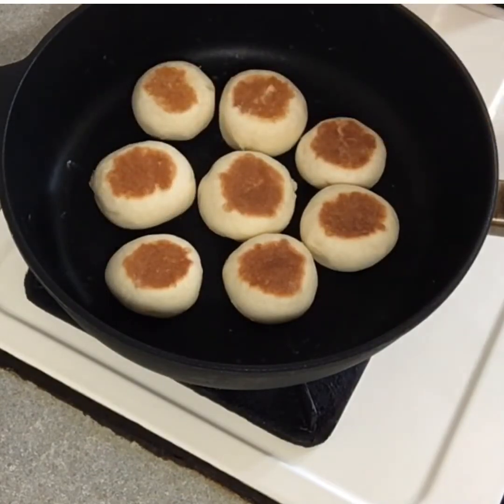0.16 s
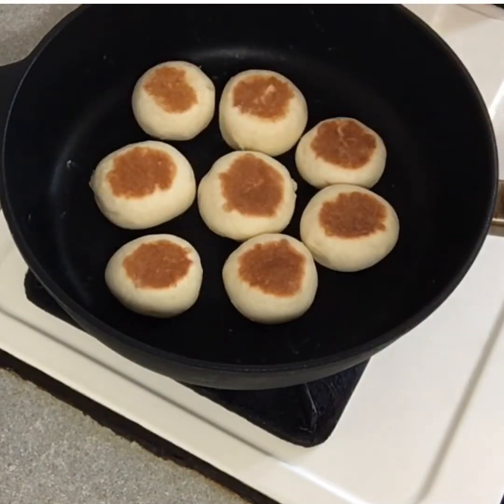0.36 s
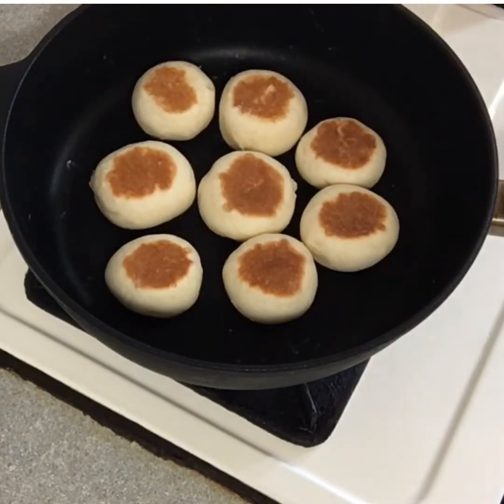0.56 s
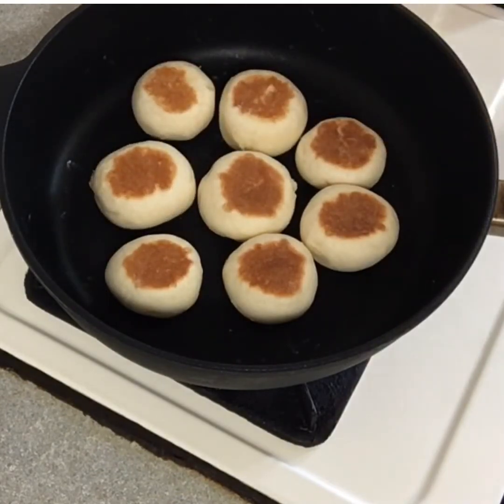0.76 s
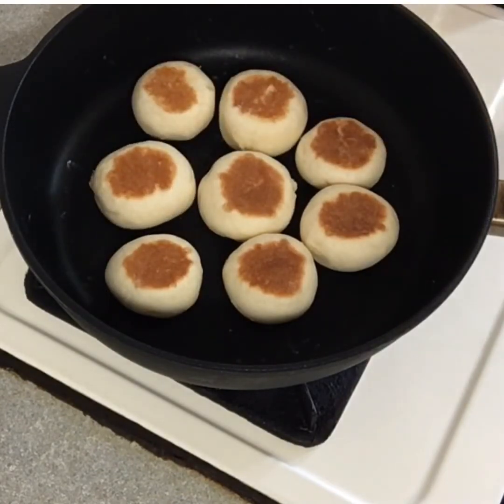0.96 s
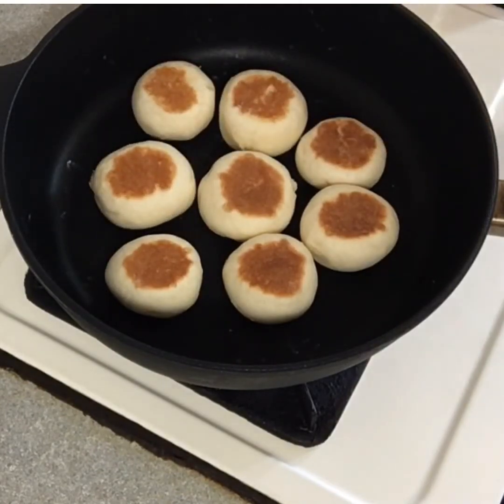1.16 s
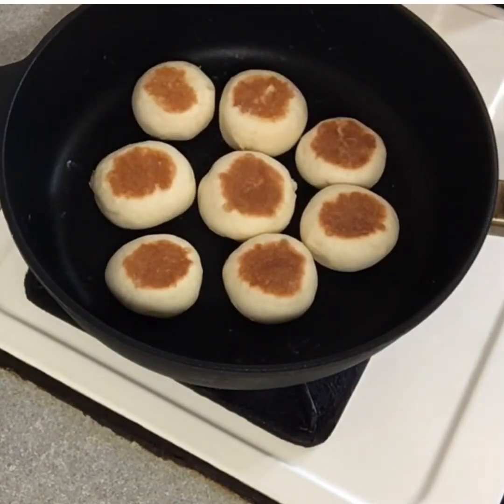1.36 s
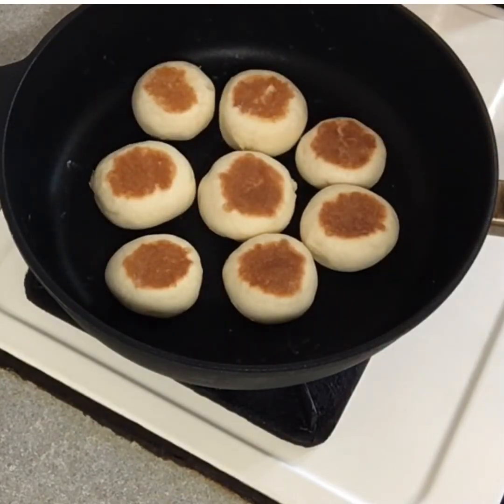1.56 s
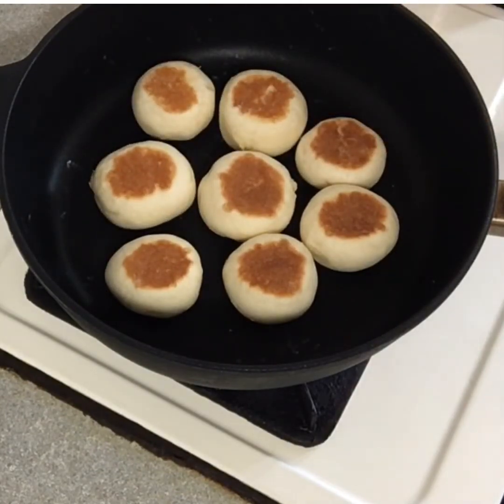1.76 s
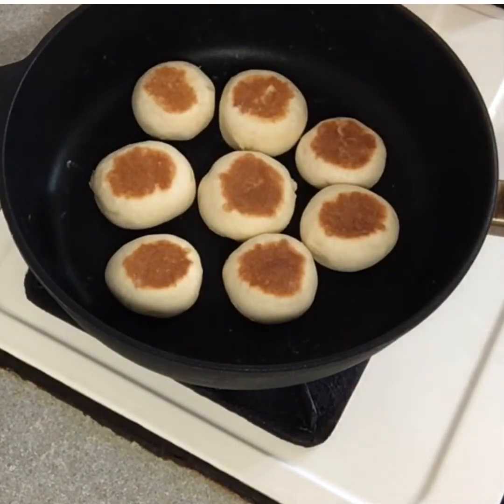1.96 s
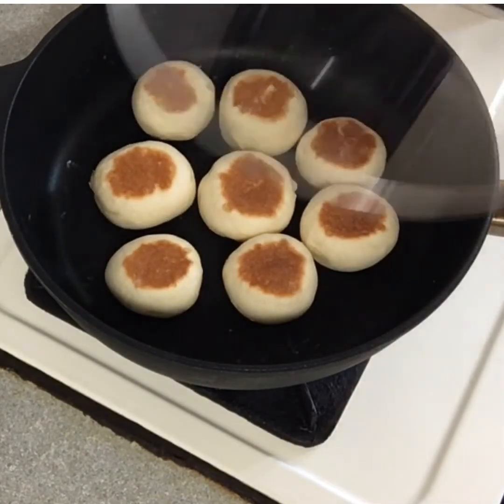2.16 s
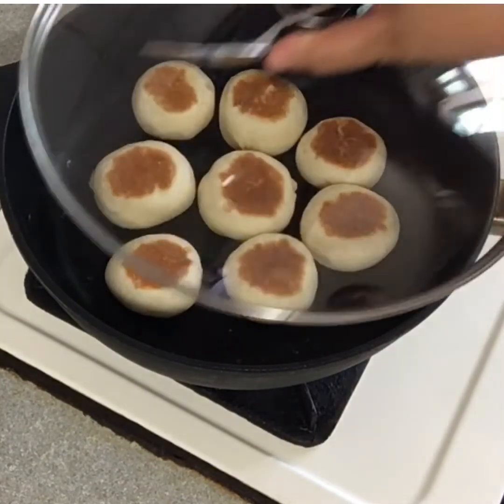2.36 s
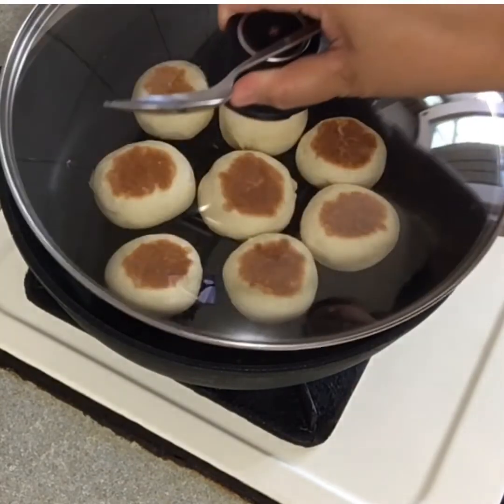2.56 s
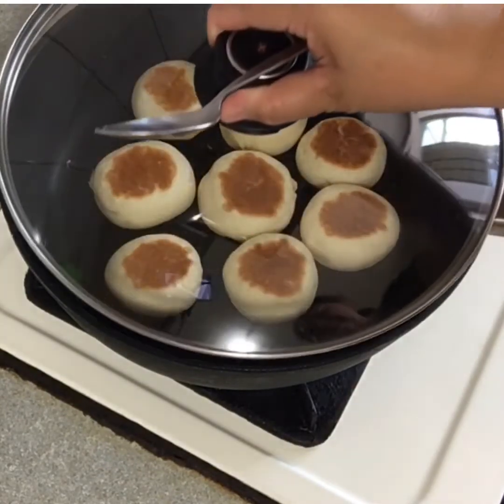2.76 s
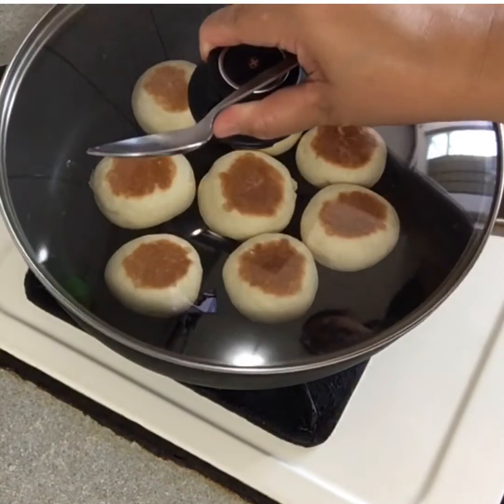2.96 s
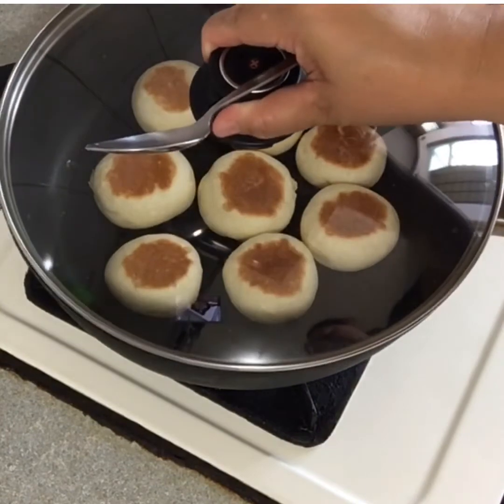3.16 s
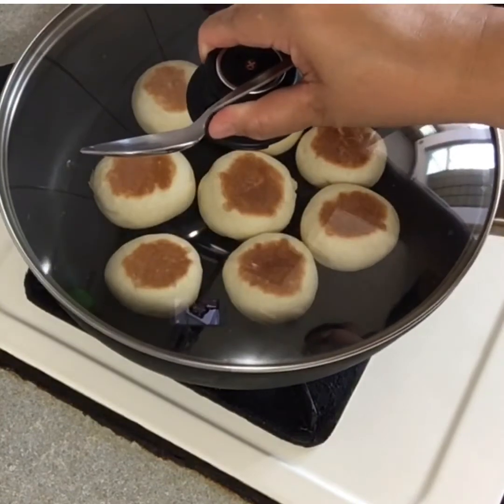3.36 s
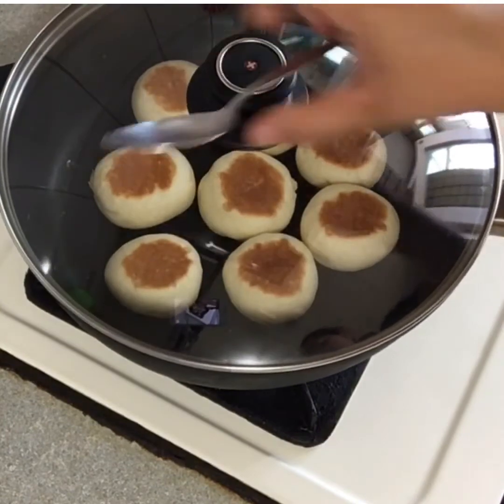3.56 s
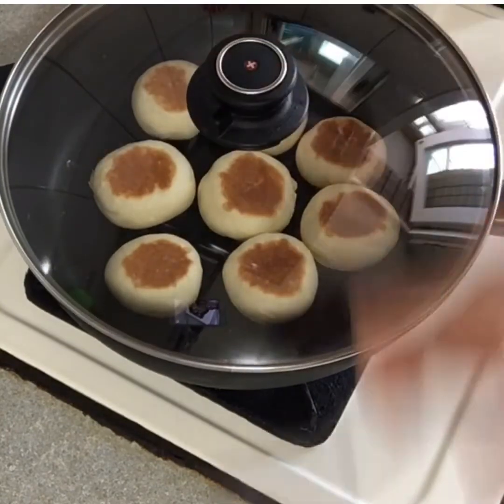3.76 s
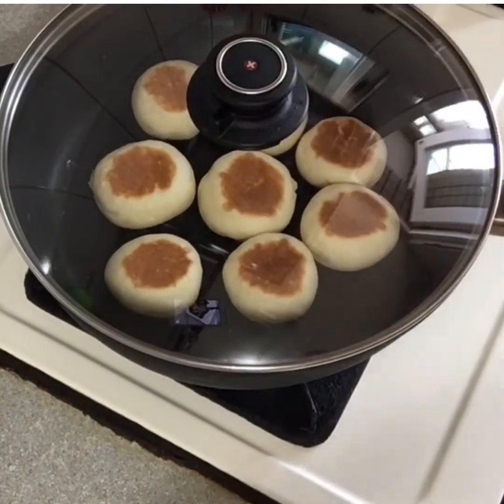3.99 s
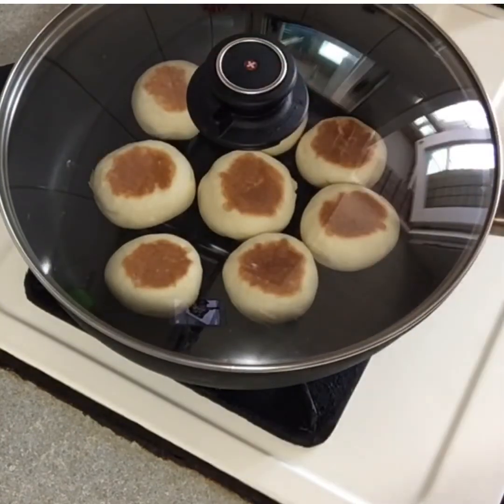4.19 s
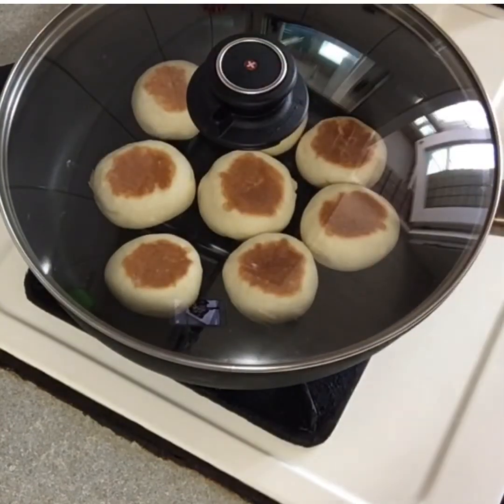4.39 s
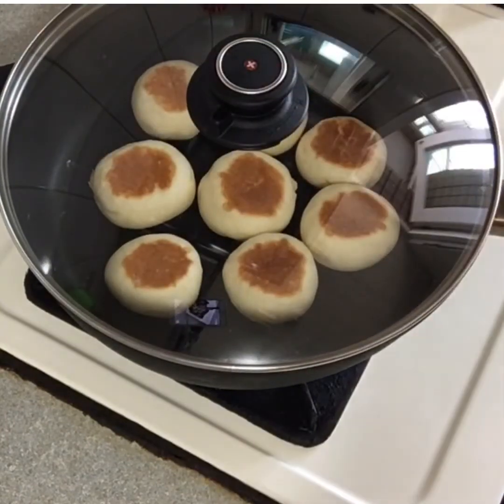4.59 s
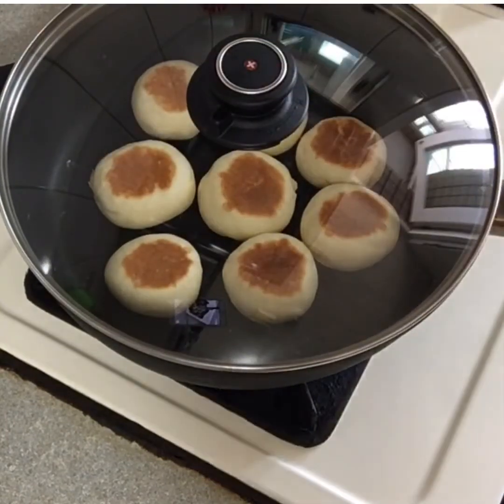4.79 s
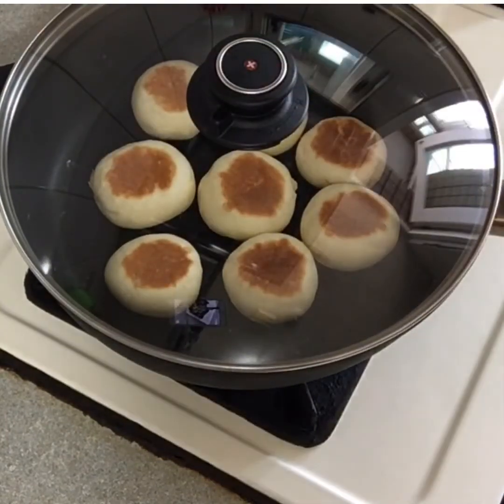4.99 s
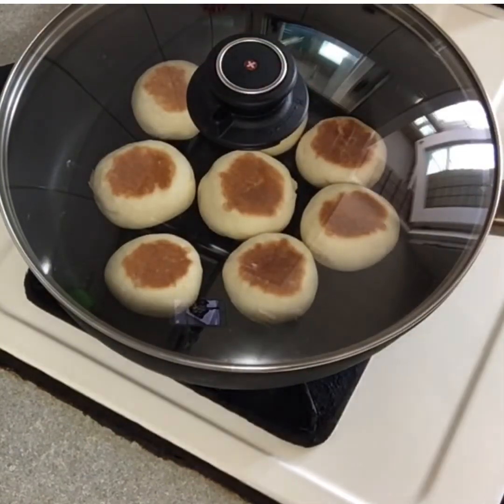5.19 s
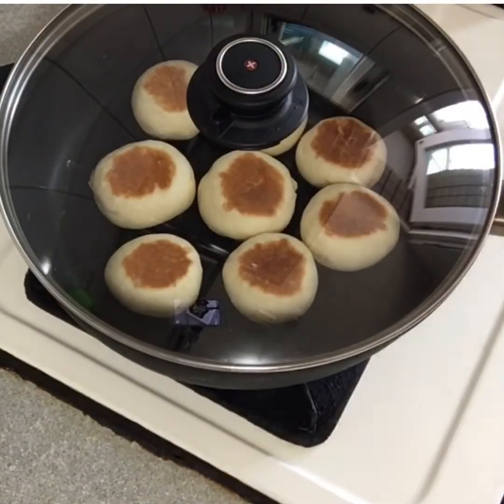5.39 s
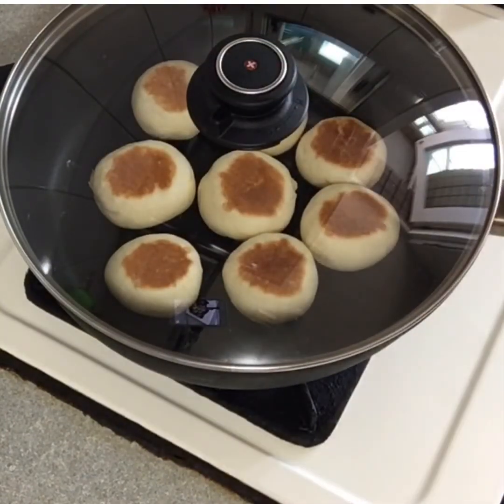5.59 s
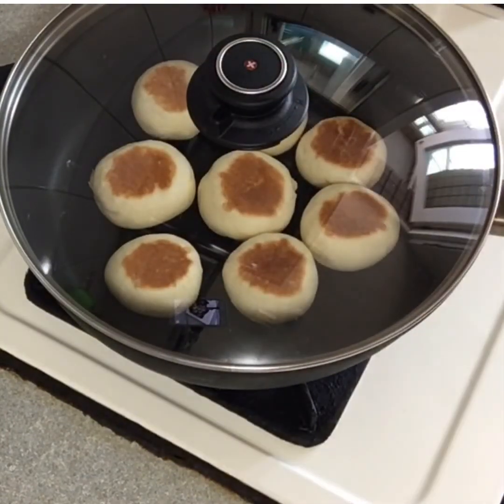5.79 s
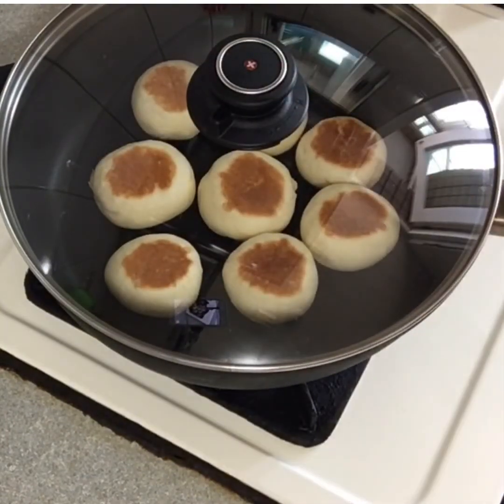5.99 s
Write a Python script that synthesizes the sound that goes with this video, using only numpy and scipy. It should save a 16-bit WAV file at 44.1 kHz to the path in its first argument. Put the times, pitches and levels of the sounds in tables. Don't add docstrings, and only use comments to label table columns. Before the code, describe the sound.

A close microphone picks up quiet room rumble and light cloth rustle. One sharp plastic clack leads to a short gritty scrape of glass. After a pause the lid lands on the pan in quick hard knocks with dull low pan tones, then a crisp spoon tap. Later comes a woody heel thud and a spoon clattering sharply onto a dish, its ring soon damped. Short, bright kitchen reflections follow.

```python
import sys
import numpy as np
from scipy import signal
from scipy.io import wavfile

SR = 44100
rng = np.random.default_rng(int(sys.argv[2]) if len(sys.argv) > 2 else 0)


def materialize(psi):
    bounded = np.clip(np.atleast_2d(psi).T, -1, 1)
    quanta = np.round(bounded * 32767).astype(np.int16)
    wavfile.write(sys.argv[1], SR, quanta)


def elevation(decibels):
    levels = np.asarray(decibels, float)
    return 10 ** (levels / 20)


N = 266283
STEP = 64

# pitch_hz [Hz], density_db [dB per Hz]
ROOM_SPECTRUM = [(21, -39), (35, -12), (64, 2), (98, -11.5), (147, -11), (176, -19), (291, -20),
                 (322, -25.5), (365, -23.5), (561, -26), (839, -25.5), (1260, -27), (13000, -55),
                 (15500, -60.5)]
CLOTH_SPECTRUM = [(290, -41.5), (500, -24), (848, -18), (1360, -5.5), (1590, -8), (2440, 0.5), (2820, -4.5),
                  (5430, -4), (15200, -22.5)]
# pitch_hz [Hz], width_hz [Hz], level_db [dB]
APPLIANCE_TONES = [
    (359.6, 18, -78),
    (601, 31, -80.5),
    (876, 12, -87.5),
    (4560, 77, -88.5),
]
# loudest_s [s], swell_s [s], fade_s [s] (both over 20 dB), level_db [dB],
# bright_db [dB per octave]
STROKES = [(0.255, 0.0071, 0.24, -66, -4), (.374, 0.26, 0.13, -69.5, 2), (0.554, 0.019, 0.23, -71, -3),
           (.93, 0.3, 0.29, -74.5, -4), (1.155, 0.012, 0.3, -64, -5), (1.42, 0.48, 0.092, -67, -5),
           (1.648, 0.039, 0.17, -66, -1.5), (2.546, 0.0039, 0.1, -77, 8), (3.91, 0.18, 0.15, -65.5, -2),
           (4.062, 0.075, 0.11, -57.5, -2), (4.52, 0.092, 1, -70.5, -1), (4.698, 0.04, 0.12, -65.5, -0.5),
           (4.802, 0.031, 0.59, -64.5, -2), (4.885, 0.0022, 0.011, -45, -4.5),
           (4.984, 0.39, 0.058, -71, -12.5), (5.725, 0.11, 0.15, -67, 0.5), (5.964, 0.097, 0.072, -62, -1),
           (6.038, 0.042, .1, -53, -2.5)]
# start_s [s], peak_db [dB], pitch_hz [Hz], t60_s [s], spread [octaves]
TICKS = [(.253, -60, 1580, 0.055, 0.16), (.553, -73, 3640, 0.029, .13), (.6, -61, 2040, 0.13, 0.027),
         (2.544, -51.5, 8150, 0.028, 0.13), (1.902, -60, 1684, 0.084, .04),
         (2.542, -59.5, 2210, 0.046, 0.075), (2.542, -49, 5660, 0.064, 0.05),
         (2.659, -59.5, 2300, 0.034, .12), (2.755, -58, 3750, 0.032, 0.089), (2.776, -60, 1210, 0.1, 0.088),
         (4.056, -44, 1920, 0.15, .15), (4.029, -59, 3220, 0.046, 0.075), (4.69, -57, 3160, 0.056, 0.12),
         (4.965, -55, 6800, 0.16, 0.068), (4.965, -62, 8240, .03, .04), (5.111, -59, 2540, 0.056, 0.016),
         (5.147, -59.5, 1378, 0.024, 0.025), (5.153, -58, 7280, 0.025, 0.073),
         (5.803, -57, 4670, 0.05, 0.012), (5.805, -65, 5540, .05, .02), (5.803, -63, 3620, .03, .05),
         (5.803, -66.5, 6800, 0.047, .05), (5.72, -58, 1900, 0.089, 0.07),
         (5.876, -57.5, 1225, 0.047, 0.27), (5.95, -65, 5500, .04, .04), (5.955, -52, 1560, 0.089, 0.17)]
# (pitch_hz [Hz], level_db [dB])
GRIPS = [(1.185, 1.39, [(1240, -61), (2358, -77)]), (1.18, 1.28, [(1240, -62), (1650, -68), (2450, -72),
         (3050, -74)]), (1.172, 1.195, [(5150, -68)]), (1.18, 1.36, [(4380, -76), (3000, -80)]),
         (1.27, 1.38, [(770, -69), (1766, -67), (6600, -79), (9500, -85), (8100, -84), (7200, -82),
         (5350, -84), (3650, -78), (2100, -76)]), (1.33, 1.45, [(2654, -74), (4480, -71), (4000, -78),
         (6100, -82), (3257, -75), (3704, -76)]), (1.37, 1.42, [(5370, -74), (1583, -72), (6600, -80),
         (9500, -84)]), (1.425, 1.475, [(2330, -66), (3600, -76), (3200, -76), (4000, -77)]),
         (1.42, 1.48, [(1135, -65)]), (1.44, 1.575, [(1135, -68), (1700, -73)]),
         (2.93, 2.975, [(1740, -62)]), (3.165, 3.207, [(3750, -82)]), (4.0, 4.115, [(2550, -68)]),
         (5.192, 5.203, [(2850, -59)]), (5.895, 5.965, [(1480, -74)])]
# start_s [s], peak_db [dB]
CRACKS = [
    (0.9877, -37),
    (1.148, -53.5),
    (2.389, -61),
    (2.5443, -51),
    (2.7821, -64),
    (3.352, -52),
    (3.5154, -46),
    (4.882, -55),
    (5.2012, -32),
]

# start_s [s], peak_db [dB], bright_db [dB per octave]
KNOB_BLOWS = [
    (.941, -63.5, -12),
    (.977, -54.5, -12),
    (.982, -60, -2),
    (.985, -50, -1),
    (.988, -23.5, 1.5),
    (.995, -49, 4),
]
LIFT_BLOWS = [
    (1.17, -32.5, -0.4),
    (1.351, -42.5, -2),
    (1.424, -48, -0.8),
    (1.644, -40, 3),
]
TOUCH_BLOWS = [
    (2.75, -24.5, 6),
    (2.78, -30.5, 4.4),
    (2.935, -17, 5.5),
    (2.965, -20, 5.3),
    (3.015, -23, 6.4),
    (3.05, -33, 14),
]
PAN_BLOWS = [(2.752, -63.5, -6.5), (2.933, -33, 0), (2.993, -56, -7), (3.038, -36, -0.67), (3.186, -64, -7),
             (3.197, -61.5, -8.5), (3.229, -36.5, -1.5), (3.324, -46, -5), (3.36, -35.5, -0.6),
             (3.787, -49.5, -2.5), (3.99, -54.5, -3), (4.221, -51.5, -2.5)]
SEATING_BLOWS = [
    (2.973, -41, -3),
    (3.044, -51, -7),
    (3.251, -36, -3.5),
    (3.289, -45, -4),
    (3.349, -34, -3),
    (3.356, -42, -0.5),
]
SETTLING_BLOWS = [(2.933, -51, -14), (2.941, -55.5, -12), (3.003, -53, -11), (3.105, -63, -14.5),
                  (3.205, -58, -9), (3.228, -49.5, -11), (3.391, -48.5, -8), (3.783, -47, -7.5),
                  (3.98, -47.5, -5.5), (4.108, -52.5, -5.5), (4.212, -59, -8.5), (4.284, -65, -5.5)]
TAP_BLOWS = [
    (3.5135, -38, 0),
    (3.515, -23, 0.95),
    (3.5187, -27.5, 0),
]
REBOUND_BLOWS = [
    (3.568, -27.5, -1.1),
]
THUD_BLOWS = [
    (1.1, -53, -1.3),
    (1.171, -61, 0.99),
    (1.2, -37.5, 1),
    (4.881, -25, -1.2),
    (5.202, -28, -0.77),
]
DROP_BLOWS = [
    (5.2012, -14.5, -.5),
    (5.2045, -30, 0),
]
ROCKING_BLOWS = [
    (5.294, -41, 2.5),
    (5.322, -35, -7.5),
    (5.345, -50, -10),
    (5.374, -41, -2.5),
    (5.391, -45, -9.5),
    (5.4153, -37, -5),
    (5.4512, -38.5, -7.5),
    (5.4832, -45.5, -6.5),
    (5.5211, -46, -6),
]

# pitch_hz [Hz], level_db [dB], t60_s [s]
KNOB_MODES = [(1430, -8, .04), (1490, -3, .04), (1581, 1, .05), (2030, 0, .03), (2650, -8, .08),
              (2740, -12, .1), (2980, -4, .11), (3114, -2, .09), (3509, -7, .11), (3640, -1, .1),
              (3760, 0, .08), (3960, -8, .12), (5530, -14, .14), (6300, -9, .03)]
LID_MODES = [(850, -4, .07), (1100, -10, .08), (1190, -10, .12), (1330, 1, .075), (1600, -12, .12),
             (1750, -6, .1), (1916, -12, .1), (2120, -8, .08), (2480, -10, .08), (2650, -5, .07),
             (3080, -10, .07), (3500, -13, .07), (4690, -17, .1), (5750, -17, .09)]
PAN_MODES = [(97.7, -2, 0.11), (134.9, -9, 0.32), (209, -4.5, 0.09), (297, -3.5, 0.09), (348.3, -6.5, 0.11),
             (399, -12, 0.048)]
TAPPED_KNOB_MODES = [(1717, -10, .04), (1800, -12, .04), (2283, -18, .06), (2694, -1, .045),
                     (2765, -6, .04), (3311, -1, .075), (3260, -4, .05), (3957, -10, .06), (4360, -17, .06),
                     (5050, -20, .05), (5640, -7, .05), (6315, -19, .06), (7120, -24, .09),
                     (9700, -29, .03)]
GLASS_TOP_MODES = [(1251, 0, .06), (1620, -9, .04), (2037, -7, .04), (2694, 2, .04), (3300, -8, .05),
                   (4150, -12, .04), (5650, -14, .05)]
FLOOR_MODES = [(194, -10, .27), (280, -6, .073), (495, -13, .16), (587, -19, .2), (668, -15, .2),
               (985, -24, .25), (1071, -25, .3), (1319, -13, .12), (1400, -17, .15), (1550, -18, .16),
               (1780, -12, .05), (2374, -18, .1), (2750, -16, .04)]
DISH_MODES = [(665, -19, .18), (1319, -26, .2), (1540, -25, .9), (2016, -24, .8), (2081, -16, .6),
              (2325, -26, 1.1), (2664, -16, .35), (2701, -18, .75), (2848, -23, .3), (3294, -9, .1),
              (3414, -1, .155), (3755, -14, .13), (4204, -6, .17), (4608, -23, .45),
              (276, -13, .12), (1075, -30, .5), (1560, -13, .09), (1680, -26, .4), (2049, -13, .12),
                  (2161, -20, .3), (3070, -13, .14), (3510, -11, .12), (3665, -14, .2), (3899, -13, .12),
                  (4358, -14, .12), (4522, -13, .2), (4780, -16, .25), (4967, -18, .3)]
SPOON_MODES = [(5064, -2, .23), (5139, -4, .25), (5448, 1, .13), (5491, -7, .25), (5875, -6, .3),
               (6636, -2, .16), (7102, -3, .25), (7140, -6, .22), (7413, -5, .23), (8104, -7, .15),
               (8199, -5, .13), (10080, -10, .13), (10700, -9, .12), (11537, -11, .2),
               (9076, -11, .2), (9500, -13, .15), (12270, -12, .2), (13000, -9, .15), (13700, -13, .2),
                   (14500, -13, .15), (15200, -16, .2)]
LYING_SPOON_MODES = [(3050, -9, .04), (3480, -3, .05), (3560, -2, .06), (4600, -4, .05), (5195, -2, .06),
                     (5860, -9, .04), (7250, -12, .04)]

# pitch_hz [Hz], density_db [dB per Hz]
KNOB_WASH = [(120, -80), (200, -11), (963, -9), (1570, 3), (2090, -7), (3600, 3), (4240, -67), (5660, -1.5),
             (15000, -84)]
LIFT_WASH = [(120, -6.5), (200, -3), (761, -7), (1130, -7), (1410, -9.5), (1810, -10.5), (15000, -75)]
SEAT_WASH = [(180, -26), (300, -1), (855, 7), (1010, -2), (1370, 16.5), (1520, 15.5), (5900, -1.5),
             (15000, -74)]
TAP_WASH = [(120, -35), (200, -14.5), (1460, -8), (1780, -1), (2380, -23), (2700, -4), (4720, -11),
            (5660, -10), (15000, -76)]
THUD_WASH = [(41, -45), (70, -17), (206, 5), (661, -11.5), (740, -10), (1360, -8.5), (3110, -27),
             (4170, -47), (15000, -68.5)]
DISH_WASH = [(180, -31), (300, -2.5), (1250, -21.5), (2620, -1.5), (2890, -33.5), (3410, 0), (3580, 1),
             (7140, -3.5), (15200, -15)]
DISH_TAIL = [(180, -17.5), (500, -13), (1200, -10.5), (2200, 3.5), (3100, 3), (4000, 6), (7200, 5),
             (8000, 3.5), (15200, -17.5)]


def rms_one(x):
    return x / np.sqrt(np.mean(x ** 2) + 1e-20)


def at_hz(points, hz):
    pitch_hz, level_db = np.array(points).T
    return np.interp(np.log(hz), np.log(pitch_hz), level_db)


def drift(rate_hz):
    r = np.exp(-2 * np.pi * STEP * rate_hz / SR)
    chance = rng.standard_normal(N // STEP + 2002)
    return rms_one(signal.lfilter([1], [1, -2 * r, r * r], chance)[2000:])


def per_sample(slow):
    return np.interp(np.arange(N) / STEP, np.arange(len(slow)), slow)


def ring(force, hz, t60):
    r = elevation(-60 / (max(t60, .001) * SR))
    w = 2 * np.pi * hz / SR
    return signal.lfilter([0, np.sin(w)], [1, -2 * r * np.cos(w), r * r], force + 1e-18)


def highpass(x, order, hz):
    return signal.sosfilt(signal.butter(order, hz, "high", fs=SR, output="sos"), x)


def bands(white):
    edges = 25 * 2 ** np.arange(0, 9.5, 1 / 3)
    out = []
    for k, (low, high) in enumerate(zip(edges, edges[1:])):
        third = signal.butter(2, [low, high], "band", fs=SR, output="sos")
        out.append((np.sqrt(low * high), signal.sosfilt(third, white[k % 2])))
    return out


def twinned(modes, apart, weaker_db):
    shift = rng.uniform(-1.1, 1, len(modes))
    return modes + [(hz * (1 + apart * k), db - weaker_db, t60) for (hz, db, t60), k in zip(modes, shift)]


def crowded(modes, low_hz, high_hz, db, t60, count):
    chance = rng.uniform(-0.78, 1, (count, 3))
    pitches = np.geomspace(low_hz, high_hz, count) * (1 + .03 * chance[:, 0])
    return modes + list(zip(pitches, db + 3 * chance[:, 1], t60 * (1 + .4 * chance[:, 2])))


def struck(blows, modes, wash, noise, ring_db, wash_db, wash_t60, damping, spread_db, rise_s):
    s, peak_db, bright_db = np.transpose(blows)
    start = round(s.min() * SR) - 10
    length = min(N - start, round((np.ptp(s) + .7) * SR))
    at = np.round(s * SR).astype(int) - start
    body = np.zeros(length)
    chance = rng.standard_normal((len(s), len(modes)))
    for (hz, level_db, t60), own in zip(modes, chance.T):
        force = np.zeros(length)
        force[at] = elevation(peak_db + ring_db + level_db + bright_db * np.log2(hz / 2000) + spread_db * own)
        body += ring(force, hz, t60) - ring(force, hz, np.log(1000) * rise_s)
    soft = np.exp(-1 / (max(rise_s, 1e-4) * SR))
    for hz, band in noise if wash else []:
        force = np.full(length, 1e-18)
        force[at] = elevation(peak_db + wash_db + at_hz(wash, hz) + bright_db * np.log2(hz / 2000))
        dying = elevation(-60 / (wash_t60 * (hz / 2000) ** -damping * SR))
        swell_and_fade = signal.lfilter([1 - soft], np.convolve([1, -dying], [1, -soft]), force)
        body += swell_and_fade * band[start:start + length]
    return np.pad(body, (start, N - start - length))


def room_hum(noise):
    shared = drift(3.5)
    hum = np.zeros(N)
    for hz, band in noise:
        level = elevation(at_hz(ROOM_SPECTRUM, hz) + 0.8 * shared + 1.2 * drift(5.1))
        hum += band[::-1] * per_sample(level)
    white = rng.standard_normal(N)
    whirr = np.zeros(N)
    for hz, width_hz, db in APPLIANCE_TONES:
        whirr += per_sample(elevation(db + 0.52 * drift(5.2))) * rms_one(ring(white, hz, 9.4 / width_hz))
    return elevation(-60.5) * rms_one(hum) + whirr


def rustle(noise):
    loudest_s, swell_s, fade_s, db, bright_db = np.transpose(STROKES)[:, :, None]
    after = np.arange(N // STEP + 2) * STEP / SR - loudest_s
    level_db = db - 20 * np.maximum(-after / swell_s, after / fade_s) + 0.51 * drift(60)
    power = elevation(2 * level_db)
    out = np.zeros(N)
    scale = np.sqrt(sum(elevation(at_hz(CLOTH_SPECTRUM, hz)) ** 2 * 2 * .23 * hz / SR
                        for hz, band in noise if hz > 2000))
    for hz, band in noise[12:]:
        strokes = np.sqrt(np.sum(power * elevation(2 * bright_db * np.log2(hz / 4000)), axis=0))
        out += band * per_sample(strokes * elevation(at_hz(CLOTH_SPECTRUM, hz) + 1.1 * drift(18)))
    return out / scale


def ticks():
    out = np.zeros(N)
    spreads = rng.standard_normal((len(TICKS), 6))
    for (s, peak_db, hz, t60, octaves), spread in zip(TICKS, spreads):
        scuff = rng.standard_normal(6000) * elevation(-60 * np.arange(6000) / SR / max(t60, .005))
        pitches = np.minimum(hz * 2 ** (octaves * spread), 15000)
        cluster = sum(ring(scuff, pitch, 90 / pitch) for pitch in pitches)
        first = round(s * SR)
        out[first:first + len(scuff)] += elevation(peak_db) * cluster[:N - first] / np.abs(cluster).max()
    return out


def cracks():
    t60_s = 0.012
    force = np.full(N, 1e-18)
    for s, peak_db in CRACKS:
        force[round(s * SR)] = elevation(peak_db - 6.0)
    burst = signal.lfilter([1], [1, -elevation(-60 / (t60_s * SR))], force) * rng.standard_normal(N)
    return highpass(burst, 2, 6400)


def heel_thud(noise):
    return struck(THUD_BLOWS, FLOOR_MODES, THUD_WASH, noise, -12, 8.8, 0.09, 0.064, spread_db=-3, rise_s=0.0012)


def dragging():
    first, last = round(1.12 * SR), round(1.49 * SR)
    grains_per_s = 350
    hits = rng.random(N) < grains_per_s / SR
    grit = hits * elevation(5.7 * rng.standard_normal(N)) * rng.choice([-1, 1], N)
    grit = grit[first:last]
    tones = np.zeros(last - first)
    for hz, db, t60 in crowded([], 692, 8000, 0, 0.17, count=48):
        tones += elevation(db - 3.4 * np.log2(hz / 2000)) * ring(grit, hz, t60)
    grind = elevation(-67) * rms_one(tones) * signal.windows.tukey(last - first, .3)
    return np.pad(grind, (first, N - last))


def singing_lid():
    steady_below_hz, flutter_width = 1900, 0.008
    out = np.zeros(N)
    for start, end, tones in GRIPS:
        first, size = round(start * SR), round((end - start) * SR)
        fade = signal.windows.tukey(size, .5)
        for hz, db in tones:
            share = 1 / (1 + (hz / steady_below_hz) ** 4)
            steady = np.sqrt(2) * np.sin(2 * np.pi * hz * np.arange(size) / SR)
            rough = rms_one(ring(rng.standard_normal(12000), hz, 2.2 / (flutter_width * hz))[-size:])
            out[first:first + size] += elevation(db) * (share * steady + (1.3 - share) * rough) * fade
    return out


def knob_and_lift(noise):
    knob = twinned(crowded(KNOB_MODES, 3350, 4050, -16, .16, count=8), 0.012, 5)
    out = struck(KNOB_BLOWS, knob, KNOB_WASH, noise, -10.5, -7, 0.15, 0.13, spread_db=0, rise_s=0.00089)
    out += struck(LIFT_BLOWS, [], LIFT_WASH, noise, 0, 6.2, 0.22, 0.38, spread_db=0, rise_s=0.00093)
    return out


def lid_on_pan(noise):
    out = struck(SEATING_BLOWS, LID_MODES, SEAT_WASH, noise, -4, -13, 0.13, .3, spread_db=3.5, rise_s=0.0008)
    out += struck(SETTLING_BLOWS, LID_MODES, SEAT_WASH, noise, -6, -11, 0.13, 0.4, spread_db=3.5, rise_s=0.0003)
    out += struck(PAN_BLOWS, PAN_MODES, None, noise, -3.5, 0, .1, .3, spread_db=3.5, rise_s=0.0057)
    out += struck(TOUCH_BLOWS, PAN_MODES, None, noise, -0.45, 0, .1, .3, spread_db=3.5, rise_s=0.002)
    return out


def spoon_tap(noise):
    knob = twinned(TAPPED_KNOB_MODES, .012, 7)
    glass = twinned(GLASS_TOP_MODES, 0.015, 8)
    out = struck(TAP_BLOWS, knob, TAP_WASH, noise, -9, -1.7, 0.089, 0.23, spread_db=0, rise_s=0.0013)
    out += struck(REBOUND_BLOWS, glass, TAP_WASH, noise, -9.5, -4, 0.1, 0.37, spread_db=0, rise_s=0.0012)
    return out


def spoon_drop(noise):
    caught_s, caught_t60_s = 5.53, 0.56
    dish = twinned(crowded(DISH_MODES, 1400, 4500, -30, .3, count=14), .004, 9)
    spoon = twinned(crowded(SPOON_MODES, 4800, 15300, -18, .17, count=34), .004, 7)
    out = struck(DROP_BLOWS, dish, DISH_WASH, noise, -11.5, -9, .14, .45, spread_db=0, rise_s=.0007)
    out += struck(DROP_BLOWS, spoon, DISH_TAIL, noise, -18.5, -22, .8, .5, spread_db=0, rise_s=.0003)
    out += struck(ROCKING_BLOWS, LYING_SPOON_MODES, DISH_TAIL, noise, -5, -13, .06, .3, spread_db=1.5, rise_s=.002)
    return out * elevation(-60 * np.maximum(np.arange(N) / SR - caught_s, 0) / caught_t60_s)


def kitchen(x, t60, cut_hz):
    time = np.arange(round(.6 * SR)) / SR
    echo = rng.standard_normal(len(time)) * elevation(-60 * time / t60) * (time > .004)
    echo = signal.lfilter(*signal.butter(1, cut_hz, fs=SR), echo)
    return signal.fftconvolve(x, echo / np.sqrt(np.sum(echo ** 2)))[:N]


def scene():
    noise = bands(rng.standard_normal((2, N)))
    background = room_hum(noise) + rustle(noise)
    blows = heel_thud(noise) + knob_and_lift(noise) + lid_on_pan(noise)
    blows += ticks() + cracks() + dragging()
    blows = highpass(blows, 3, 70)
    near = spoon_tap(noise) + spoon_drop(noise)
    sent = blows + elevation(-7) * near
    wet = elevation(-13.5) * kitchen(sent, t60=0.41, cut_hz=12300)
    return (background + blows + near + wet + singing_lid())[None]


def band_limit(x):
    return signal.sosfilt(signal.butter(12, 16540, fs=SR, output="sos"), x)


def record(dry):
    dry = highpass(dry, 4, 40)
    mix = signal.sosfilt(signal.cheby2(12, 60, 16550, fs=SR, output="sos"), dry)
    return band_limit(mix)


dry = scene()
out = record(dry)
materialize(out)
```